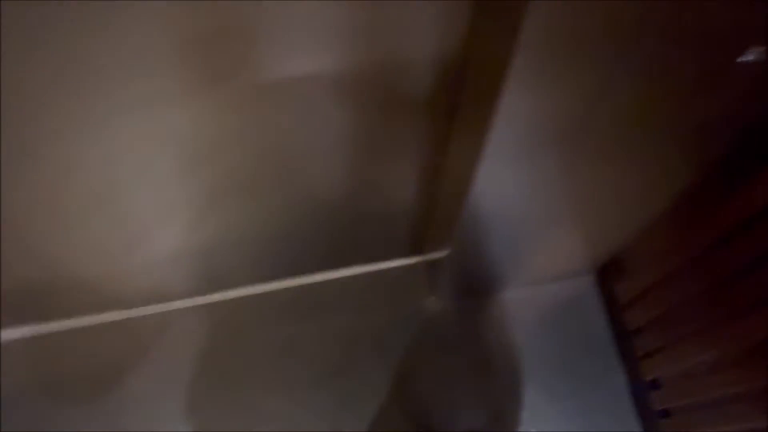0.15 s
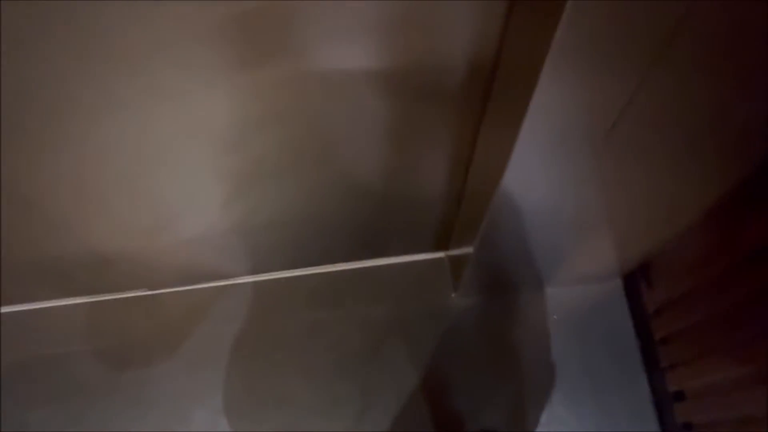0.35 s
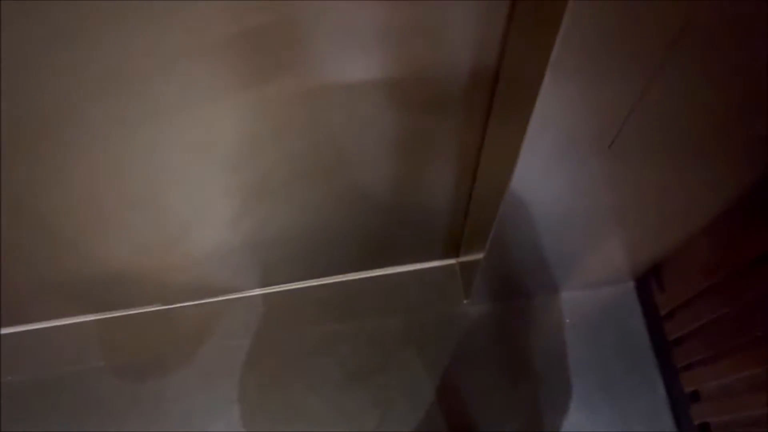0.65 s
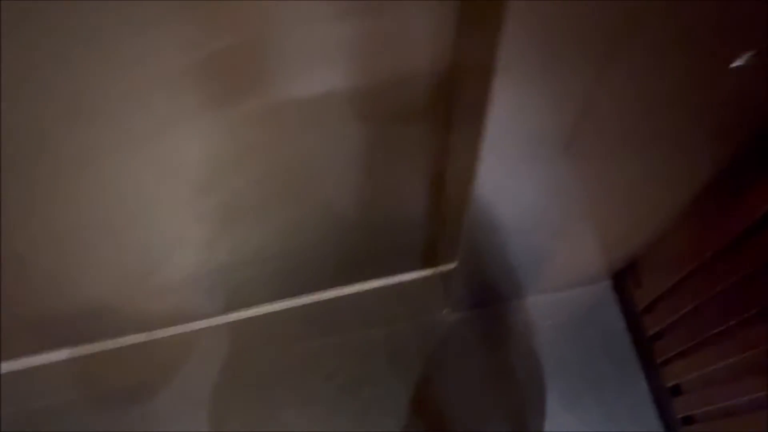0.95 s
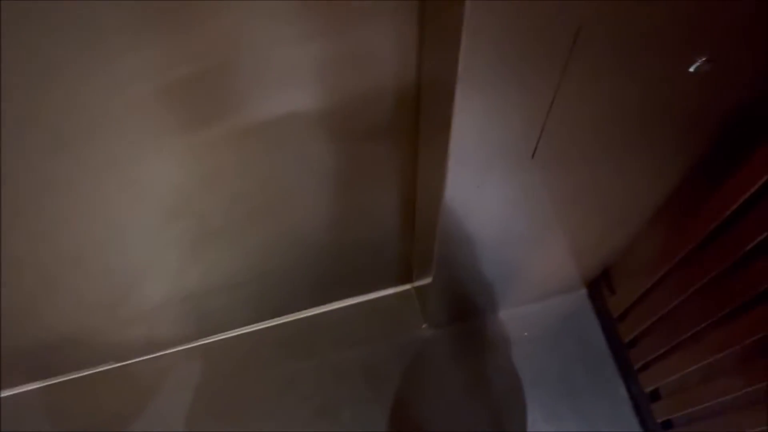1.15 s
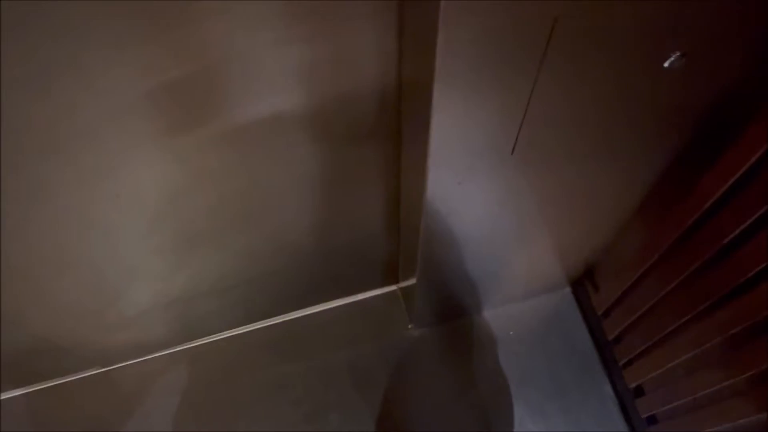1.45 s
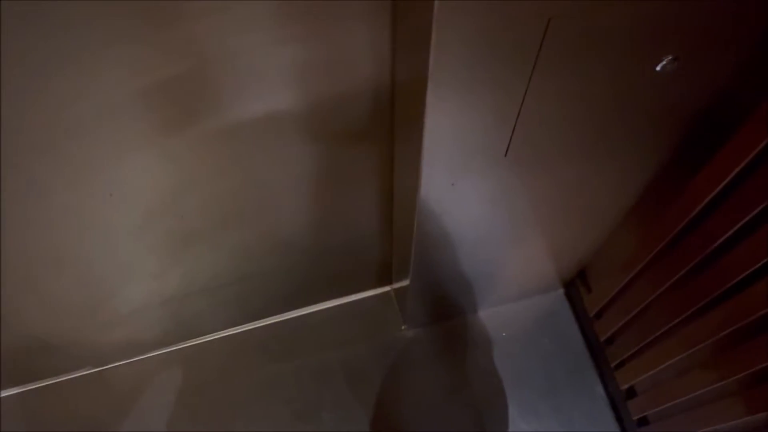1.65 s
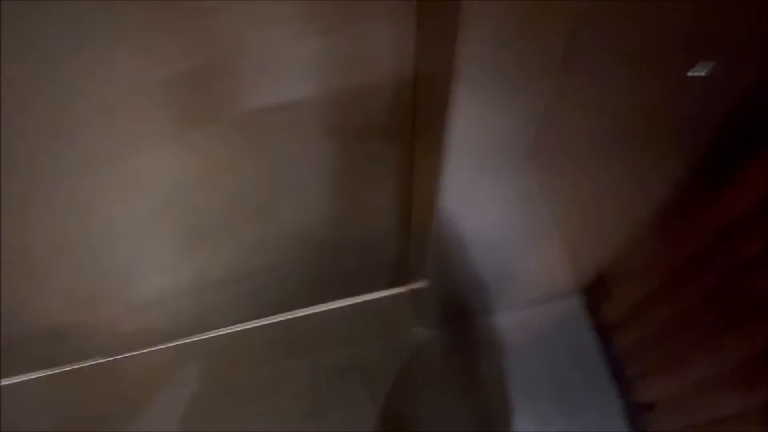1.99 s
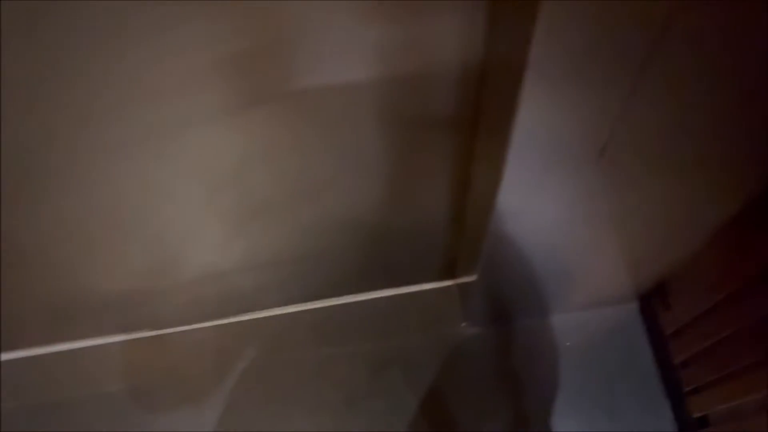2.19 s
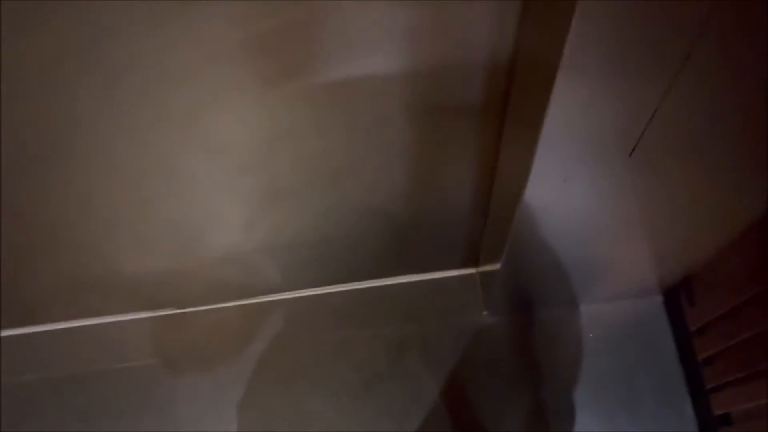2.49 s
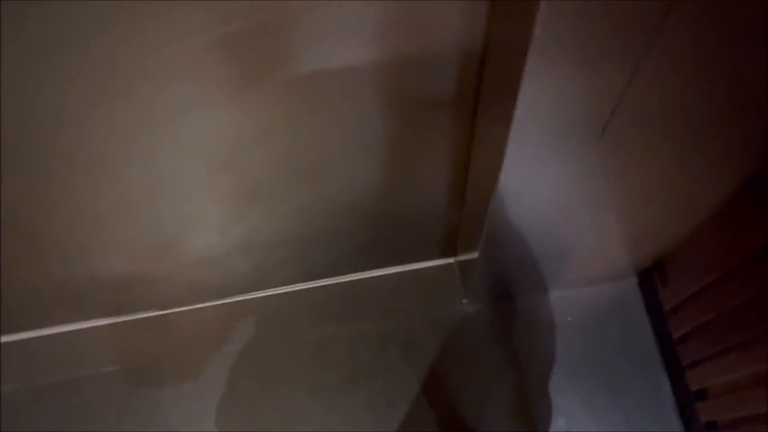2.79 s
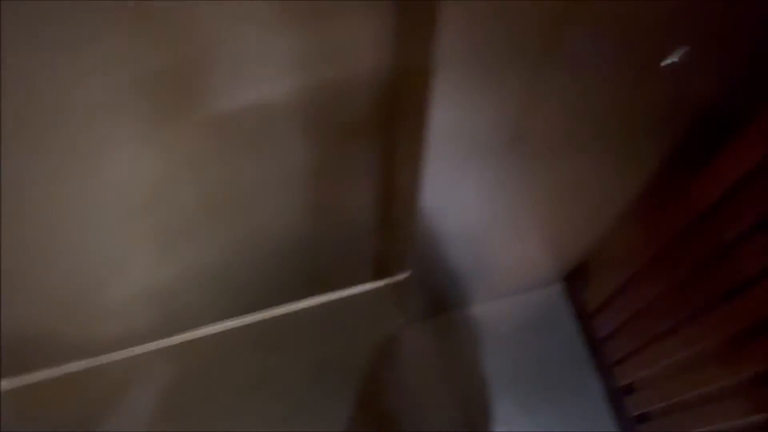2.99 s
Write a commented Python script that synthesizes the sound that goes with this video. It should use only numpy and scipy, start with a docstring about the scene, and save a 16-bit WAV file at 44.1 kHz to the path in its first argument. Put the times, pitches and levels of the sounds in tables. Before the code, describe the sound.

Steady low rumble and fan air inside a small moving lift, with a faint wavering drive whine; a hard knock early, a tiny metallic tinkle, later a rattling bump and taps, picked up closely in stereo.

```python
"""Rumble and fan air are heard first, noise coloured by the low peaks and few dips of a small moving lift cabin.
Over them the drive whines faintly, a sum of wavering harmonic partials, and cloth rustles as soft noise.
A hard knock excites damped panel modes and a noise crack; the cabin answers with a decaying noise tail.
A small metal part tinkles in two short modes; later come a bump with a rattle and two taps, and soft scuffs.
Two close microphone ports pick this up, with the bass nearly alike in both."""
import sys
import numpy as np
from scipy import signal
from scipy.fft import rfft, irfft
from scipy.io import wavfile

SR = 44100
rng = np.random.default_rng(int(sys.argv[2]) if len(sys.argv) > 2 else 0)


def dump(signal):
    """Clip the signal to [-1, 1] and save it as 16-bit WAV at the path in sys.argv[1]."""
    limited = np.clip(np.atleast_2d(signal).T, -1, 1)
    pcm = np.round(limited * 32767).astype(np.int16)
    wavfile.write(sys.argv[1], SR, pcm)


def rack_gain(trim_db):
    """Turn a fader trim in dB into the linear factor to multiply a signal by."""
    fader = np.asarray(trim_db, float)
    return 10 ** (fader / 20)


N = 138474  # samples


def table(rows, hz):
    """Interpolate (Hz, value) points linearly along a logarithmic frequency axis."""
    points = np.array(rows, float)
    return np.interp(np.log(np.maximum(hz, 1)), np.log(points[:, 0]), points[:, 1])


def curve(rows, axis=1):
    """Interpolate one column of time rows linearly at every sample."""
    points = np.array(rows, float)
    return np.interp(np.arange(N) / SR, points[:, 0], points[:, axis])


def noise(gain, size=N):
    """Filtered noise: a white spectrum times gain(f/Hz), brought to unit rms."""
    x = irfft(rfft(rng.standard_normal(size)) * gain(np.fft.rfftfreq(size, 1 / SR)), size)
    return x / x.std()


def walk(rate_hz):
    """Slow random fluctuation: low-passed noise without a mean, of unit rms."""
    return noise(lambda f: (f > 0) * np.exp(-(f / rate_hz) ** 2))


def decay(t, t60):
    """Exponential damping: the amplitude falls by 60 dB in t60 seconds."""
    return np.exp(-np.log(1000) * t / t60)


def ring(hz, t60, phase, size=SR // 2):
    """Damped free vibration of one mode; its phase shift settles within the first cycles."""
    t = np.arange(size) / SR
    return np.sin(2 * np.pi * hz * t + phase * (1 - np.exp(-t * hz))) * decay(t, t60)


def burst(gain, t60):
    """Impulsive excitation: coloured noise under an exponential decay."""
    return noise(gain, size=4096) * decay(np.arange(4096) / SR, t60)


def add(out, x, at_s, pan_db):
    """Interaural-style cues: a level difference (positive is left) and a one-sample lag on the right."""
    for ch, side in enumerate((.5, -.5)):
        i = int(at_s * SR) + ch
        out[ch, i:i + len(x)] += x[:N - i] * rack_gain(pan_db * side)


def air():
    """Filtered noise: broadband rumble and fan air with peaks, and a few dips, of the small cabin."""
    # spectral density of the ports' sum and difference: f/Hz, relative density/dB per Hz
    mid_colour, side_colour = [(12, -56.5), (20, -24.5), (44, -7), (112, -4), (153, -15.5), (185, -2.5),
                               (219, -13.5), (315, -13.5), (393, -25), (439, -11), (1070, -35.5),
                               (1820, -34), (2150, -36.5), (2760, -39), (15500, -81)], [(12, -67), (20, -36), (85, -19), (298, -5.5), (505, -23),
                                                (549, -12.5), (1160, -23.5), (1820, -32), (2270, -32),
                                                (3640, -37.5), (15500, -77.5)]
    # peaks and, where the gain is negative, dips of the cabin:
    # f/Hz, full width at half the dB gain/Hz, gain in the sum/dB
    cabin = [(35.4, 20, 1.5), (58.5, 12.7, 14), (105.7, 4.93, 12), (124.4, 17, 13), (153.7, 34.7, 6),
             (205, 4, -1), (197.5, 9, 6), (235, 13, 6), (320.4, 38.7, 9.5), (366.7, 27, 15), (452, 99, -3),
             (537.6, 21, -8.5)]
    # chance level of the noise below 80 Hz in this one stretch: t/s, gain/dB
    deep_level = [(0, -2), (.3, 0), (.7, 1), (1.05, 2.5), (1.3, 4), (1.55, -8.5), (1.8, 0), (2.15, 5),
                  (2.35, -2.5), (2.56, 6), (2.75, -3), (3.14, 4.5)]
    mid_db, side_db = -34, -47

    def cabin_gain(f):
        return rack_gain(sum(db / (1 + (2 * (f - hz) / width) ** 2) for hz, width, db in cabin))

    mid = noise(lambda f: (f > 12) * rack_gain(table(mid_colour, f)) * cabin_gain(f)) * rack_gain(mid_db)
    deep = signal.sosfiltfilt(signal.butter(3, 80, fs=SR, output="sos"), mid)
    body = signal.sosfiltfilt(signal.butter(2, 400, fs=SR, output="sos"), mid) - deep
    surge_db = 1.8 * walk(4.8) - 0.35
    mid = mid + deep * (rack_gain(curve(deep_level)) - 1) + body * (rack_gain(surge_db) - 1)
    # peaks and dips have half their dB gain in the difference
    side = noise(lambda f: (f > 12) * rack_gain(table(side_colour, f)) * np.sqrt(cabin_gain(f))) * rack_gain(side_db)
    # high-passed sum, corner near 280 Hz: the right is louder above it
    upper = signal.lfilter([1, -1], [1, -.96], mid)
    side = side - .02 * mid - .1 * upper
    return np.array([mid + side, mid - side])


def whine():
    """Harmonic synthesis: drive partials share a wavering fundamental and drift in phase between ports."""
    # fading partials: t/s, relative level/dB of partials 1, 2, 3 and 4
    fades = [(0, -67, -67, -80, -69.5), (.1, -79, -67.5, -83, -79), (.4, -78, -59, -77, -76.5),
             (.58, -79, -59.5, -63, -80), (.88, -65.5, -63.5, -81.5, -81.5), (1.08, -75, -65, -74, -79.5),
             (1.18, -85, -74.5, -82, -78), (1.26, -85, -61, -68.5, -77.5), (1.35, -90, -61, -69.5, -80),
             (1.43, -66, -74, -68, -99), (1.54, -86.5, -62, -62.5, -85), (1.7, -58.5, -57.5, -77, -75.5),
             (1.78, -75, -81, -87, -75), (1.84, -68, -59.5, -73, -75), (1.98, -83, -62.5, -77, -81),
             (2.1, -67, -66, -78, -75.5), (2.24, -60.5, -55.5, -78, -76), (2.36, -69, -54.5, -68, -68),
             (2.52, -99, -58.5, -69.5, -70), (2.75, -67, -62, -75, -80.5), (2.92, -76, -67, -74, -73.5),
             (3, -82, -79, -78, -74.5), (3.14, -75, -59.5, -74, -80)]
    # upper partials: harmonic number, relative level/dB
    upper_partials = [(5, -91), (6, -94)]
    # mean level difference of partials 1 to 6, left over right: level difference/dB
    pans = [0, 5, 0, 2, 0, 3]
    fundamental_hz = 895.4
    turn = 2 * np.pi * np.cumsum(fundamental_hz * (1 + 0.0014 * walk(6.4))) / SR
    parts = [(k, curve(fades, axis=k)) for k in range(1, 5)]
    parts += [(k, db + 3 * walk(7)) for k, db in upper_partials]
    out = 0
    for (k, db), pan_db in zip(parts, pans):
        lag = 1.3 + .4 * walk(2)  # phase between the ports, rad
        pan = rack_gain(np.array([[.5], [-.5]]) * (pan_db + 1.5 * walk(0.5)))
        level = np.sqrt(2) * rack_gain(db + 3 + 2.0 * walk(16))
        out = out + level * pan * np.sin(k * turn + np.array([lag, -lag]) / 2)
    return out


def rustle():
    """Amplitude-modulated friction noise: moving cloth hisses with a rapid random grain."""
    # course of the rustle: t/s, relative level/dB
    course = [(0, -78), (.13, -74.5), (.3, -83), (.42, -81), (.6, -80), (.7, -77), (.9, -83), (1.15, -97.5),
              (1.85, -92.5), (1.97, -83.5), (2.2, -82), (2.36, -82), (2.62, -76.5), (2.8, -90),
              (2.97, -82.5), (3.14, -79)]
    # colour of the cloth: f/Hz, relative density/dB per Hz
    cloth = [(1500, -17), (4000, 1), (7000, -7.5), (10000, -11.5), (13000, -11), (14800, -18),
             (15800, -51.5)]

    def gain(f):
        return rack_gain(table(cloth, f))

    mid, side = noise(gain), 1.1 * noise(gain)
    return np.array([mid + side, mid - side]) * rack_gain(curve(course) + 8.5 + 1.2 * walk(60))


def scuffs():
    """Partly coherent noise: grainy half-sine swells, only partly shared by the two ports."""
    # swells: t/s, length/s, relative level/dB, centre f/Hz
    swells = [(0.572, 0.17, -51.5, 420), (0.663, 0.047, -56, 1200), (2.376, .085, -46, 540),
              (2.401, 0.043, -59, 3720), (2.638, 0.068, -51, 786)]
    out = np.zeros((2, N))
    t = np.arange(N) / SR
    for s, length, db, hz in swells:
        swell = np.sin(np.pi * np.clip((t - s) / length, 0, 1)) * rack_gain(db + 2.3 * walk(90))

        def band(f):
            return np.exp(-(np.log2(f / hz + 1e-9) / 1.02) ** 2)

        shared, left, right = (noise(band) for _ in range(3))
        out = out + swell * (shared + 1.5 * np.array([left, right]))
    return out


def tinkle():
    """Modal synthesis: each strike of a small metal part excites two strongly damped modes."""
    # strikes: t/s, level of the upper mode/dB, lower mode relative to it/dB
    strikes = [(.641, -78, -25), (0.669, -51, -0.5), (.702, -50, -31), (0.749, -53.5, -32),
               (0.8352, -54.5, -24), (0.8494, -54.5, -5.5), (.877, -65, -27), (.8925, -61, -20),
               (.957, -75, -14), (1.015, -62, -5.5), (1.1115, -61, -24)]
    upper_hz, lower_hz, t60 = 12250, 6870, .013
    out = np.zeros((2, N))
    for s, db, low_db in strikes:
        strike = ring(upper_hz, t60, 0) + rack_gain(low_db) * ring(lower_hz, t60, 0)
        add(out, rack_gain(db) * strike, s, 0)
    return out


def small_hits():
    """Impact excitation: clicks pair a short resonance with a broad snap; bumps excite low floor modes."""
    # clicks of the rattle and the taps: t/s, relative ring level/dB, ring f/Hz, relative snap level/dB
    clicks = [(2.369, -78, 11000, -63), (2.373, -51.5, 12900, -47), (2.379, -46.5, 2320, -48),
              (2.385, -38.5, 4390, -43), (2.394, -39.5, 1070, -37), (2.399, -45, 3460, -43),
              (2.405, -39.5, 1250, -58), (2.417, -38.5, 850, -38.5), (2.421, -47, 3610, -43),
              (2.429, -46.5, 4400, -49), (2.5525, -38, 4300, -52), (2.554, -43, 1950, -60),
              (2.558, -45, 1010, -58), (2.659, -55, 3800, -62), (2.6665, -32, 2020, -59),
              (2.667, -45, 3700, -62), (2.671, -35.5, 750, -56), (1.988, -48.5, 1850, -69)]
    # colour of the snap: f/Hz, relative density/dB per Hz
    snap_colour = [(300, -9), (1000, -1), (4000, -15), (7000, -16.5), (10500, -8.5), (13000, -11.5),
                   (15500, -26)]
    # dull bumps through the floor: t/s, relative level/dB
    bumps = [(2.382, -21.5), (2.410, -23), (2.557, -31.5)]
    # floor modes: f/Hz, relative level/dB, t60/s
    floor_modes = [(103, 0.5, 0.24), (124.6, -6.5, 0.22), (260, -19.5, 0.34)]
    ring_t60, snap_t60 = .018, .02  # s
    out = np.zeros((2, N))
    for s, db, hz, snap_db in clicks:
        width_hz = 150 + 0.061 * hz
        grain = burst(lambda f: 1 / (1 + ((f - hz) / width_hz) ** 2), ring_t60)
        click = ring(hz, ring_t60, 0, size=4096) + 0.62 * grain
        add(out, rack_gain(db) * click, s, 7.5)
        snap = burst(lambda f: rack_gain(table(snap_colour, f)), snap_t60)
        add(out, rack_gain(snap_db) * snap, s, 2.5)
    for s, db in bumps:
        for hz, mode_db, t60 in floor_modes:
            add(out, rack_gain(db + mode_db) * ring(hz, t60, 0), s, -.6)
    return out


def knock():
    """Modal excitation: a broadband crack and damped panel modes, with level differences between ports."""
    # modes of the knocked panel: f/Hz, relative level/dB, t60/s
    panel = [(350, 5, .08), (560, 6, .08), (745, 12, .08), (1000, 6, .05), (1235, 11, .07),
             (1525, 20, .035), (1600, 13, .035), (1990, 13, .03), (2170, 11, .03), (2900, 5, .028)]
    # colour of the crack: f/Hz, relative density/dB per Hz
    crack_colour = [(250, -12.5), (550, 5.5), (1000, 2.5), (1700, -11), (3000, -8.5), (5000, -8),
                    (7000, -21.5), (10000, -9.5), (13000, -15.5), (15500, -36)]
    at_s, crack_db, crack_t60, modes_db = .4405, -32, .045, -42
    rise_s = .004  # at 1 kHz
    out = np.zeros((2, N))
    crack = burst(lambda f: rack_gain(table(crack_colour, f)), crack_t60)
    add(out, rack_gain(crack_db) * crack, at_s, 3)
    t = np.arange(SR // 2) / SR
    for (hz, db, t60), (phase, lean) in zip(panel, rng.standard_normal((len(panel), 2))):
        rise = 1 - np.exp(-(t / rise_s * (hz / 1000) ** 2) ** 2)  # low modes speak later
        mode = rise * ring(hz, t60, 3 * phase)
        add(out, rack_gain(modes_db + db) * mode, at_s, 9.2 * (hz > 1400) + 4.5 * lean)
    return out


def room(near, far):
    """Reverberation: dense reflections of the metal cabin, as noise decaying faster in the treble."""
    # reverberation time: f/Hz, t60/s
    room_t60 = [(200, .45), (1000, .42), (2000, .4), (4000, .4), (12000, .3)]
    near_db, far_db, build_up_s = -6, -1, .018  # reflection levels, and time to build up
    t = np.arange(SR // 2) / SR
    reflections = []
    for ch in rack_gain(near_db) * near + rack_gain(far_db) * far:
        tail = 0
        for hz in 250 * 2. ** np.arange(7):
            octave = noise(lambda f: np.exp(-(np.log2(f / hz + 1e-9) / .5) ** 2), size=len(t))
            # sqrt(hz) gives the octaves about equal power per Hz before they decay
            tail = tail + octave * np.sqrt(hz) * decay(t, table(room_t60, hz))
        tail = tail * np.clip(t / build_up_s, 0, 1) ** 2
        tail = tail / np.sqrt(np.sum(tail ** 2))
        reflections.append(signal.fftconvolve(ch, tail)[:N])
    return near + far + np.array(reflections)


def scene():
    """Superposition: steady sources add directly; the impacts and scuffs also excite the reverberation."""
    near = small_hits() + scuffs() + tinkle()
    return air() + whine() + rustle() + room(near, knock())


def roll_off(x):
    """The treble ends steeply here."""
    return signal.sosfilt(signal.butter(12, 15760, fs=SR, output="sos"), x)


def record(dry):
    """Linear filtering: a steep low-pass, and one treble notch each in the ports' sum and difference."""
    f = np.fft.rfftfreq(N, 1 / SR)
    low_pass = 1 / np.sqrt(1 + (f / 15200) ** 60)

    def response(hz, width_hz, db):
        return low_pass * rack_gain(db * np.exp(-((f - hz) / width_hz) ** 2))

    mid = irfft(rfft(dry[0] + dry[1]) * response(8470, 950, -13), N) / 2
    side = irfft(rfft(dry[0] - dry[1]) * response(11500, 1300, -23), N) / 2
    return roll_off(np.array([mid + side, mid - side]))


dry = scene()
out = record(dry)
dump(out)
```